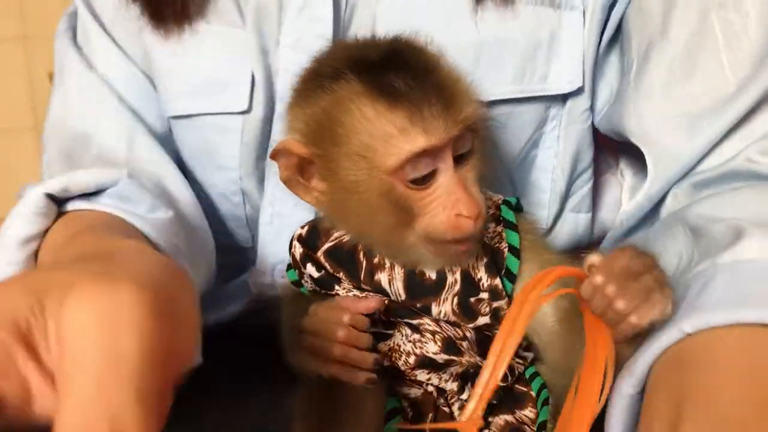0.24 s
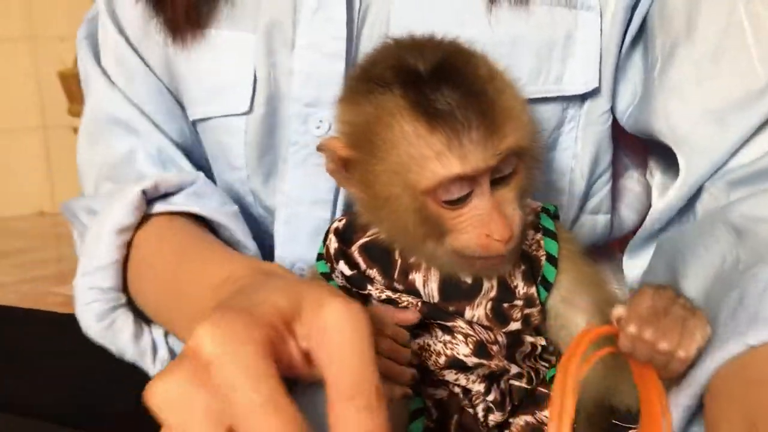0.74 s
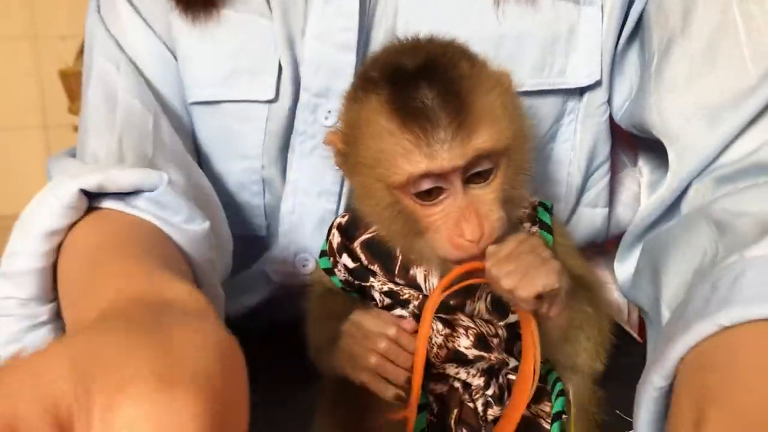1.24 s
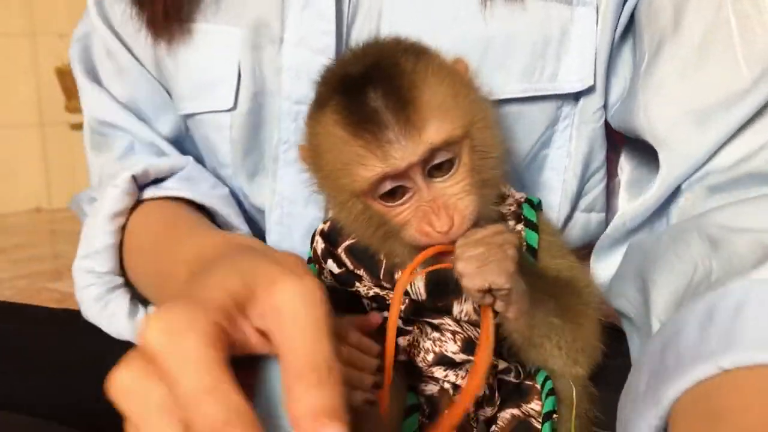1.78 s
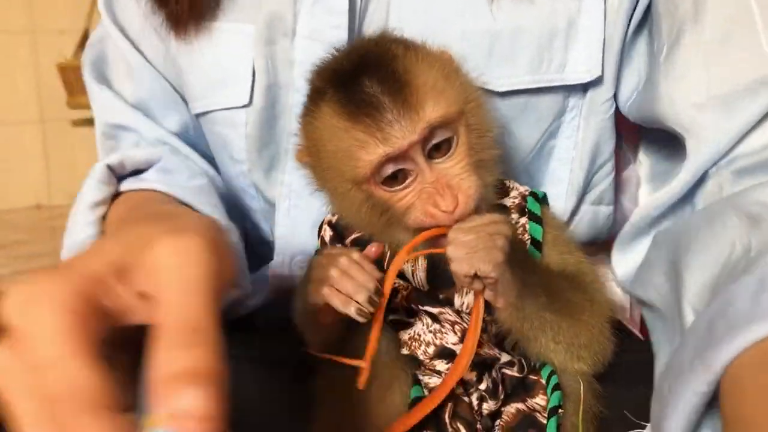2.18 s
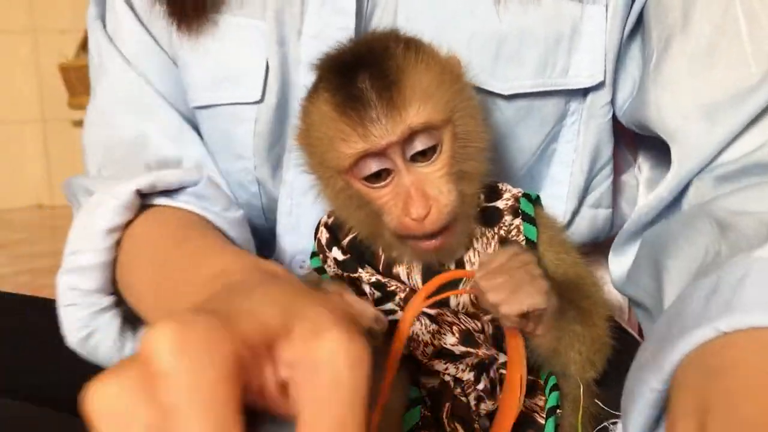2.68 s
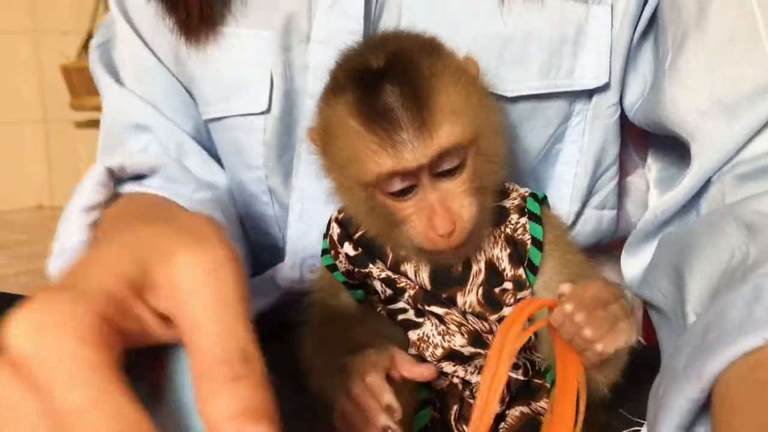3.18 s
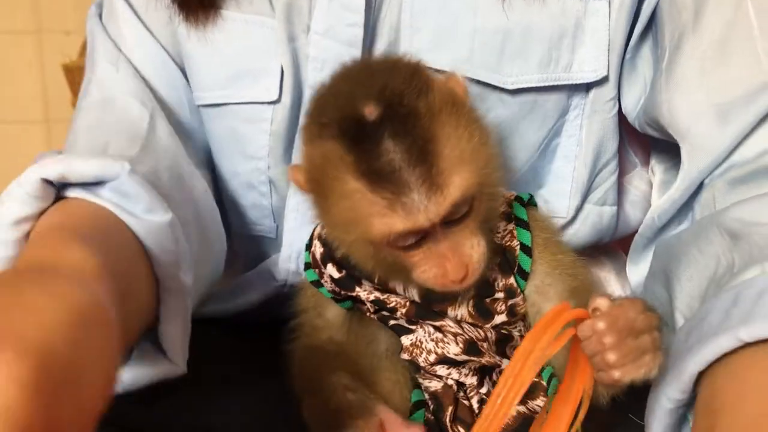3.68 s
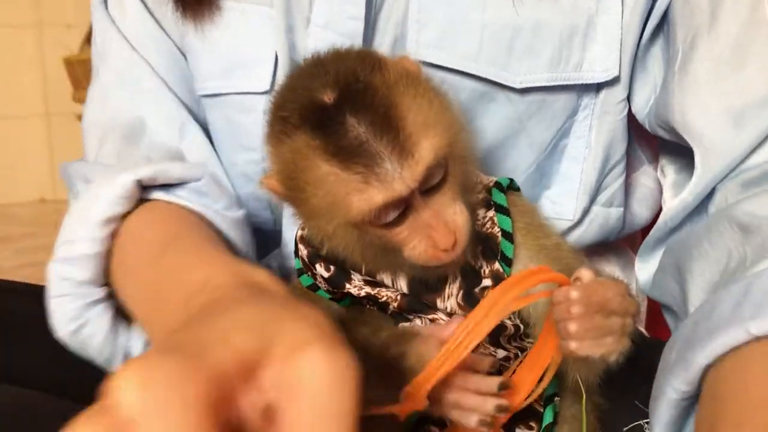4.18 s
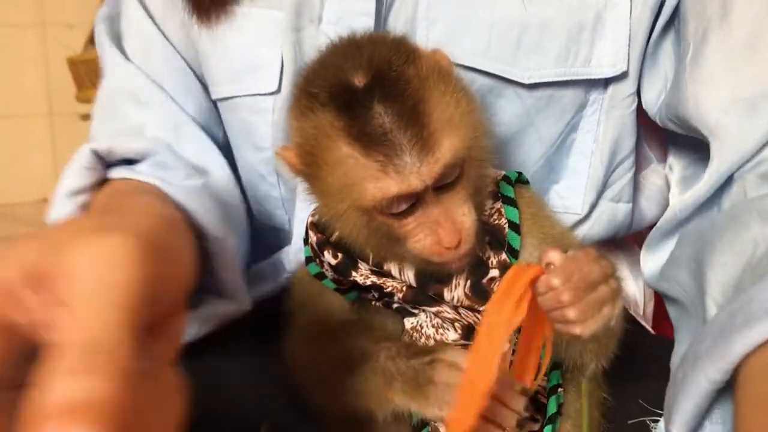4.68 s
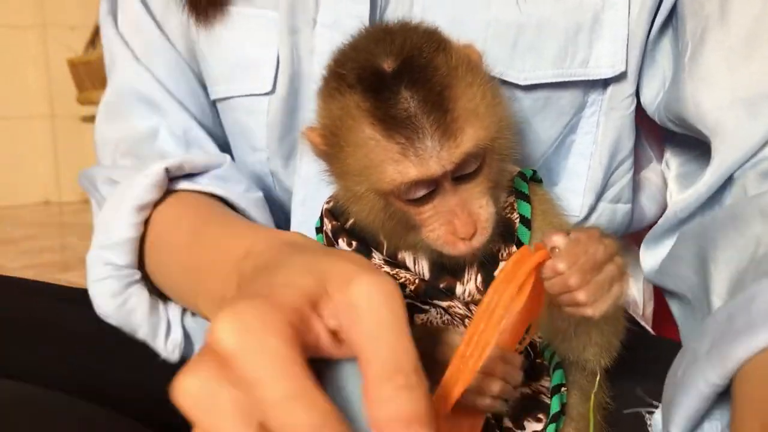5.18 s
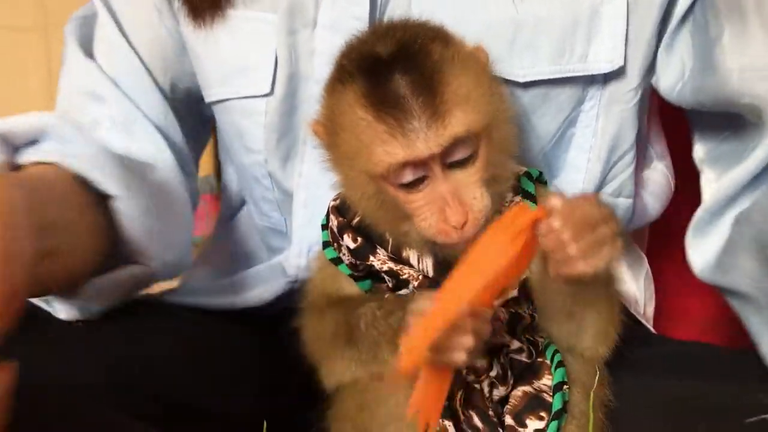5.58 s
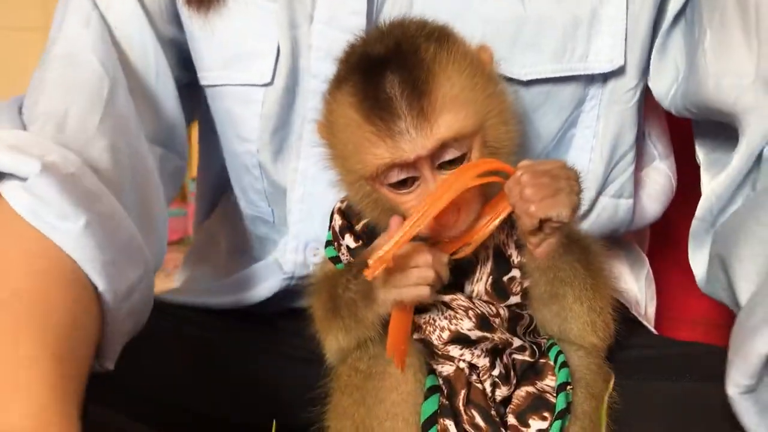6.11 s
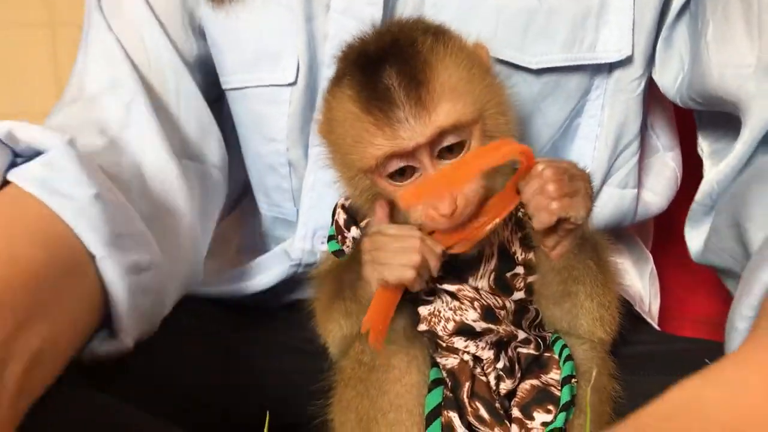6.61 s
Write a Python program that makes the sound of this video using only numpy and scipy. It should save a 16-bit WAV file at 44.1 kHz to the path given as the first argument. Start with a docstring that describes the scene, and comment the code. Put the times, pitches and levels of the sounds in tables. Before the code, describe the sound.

A hand peeler rasps five times along a firm vegetable, each crisp hissing stroke starting with a sharp click, over faint low rumble in a quiet room.

```python
"""In a quiet home, a hand peeler is drawn five times along a firm vegetable close to a small microphone.
The blade lands with a crackle, then hisses: tiny random breaks shake the blade, whose slot and edge sing.
Small ticks are bursts of ringing noise; dull knocks on the board and a faint squeak are resonances and tones.
Cloth and peel rustle as filtered crackle; a far engine idles outside as a few sines over the room's air."""
import sys
import numpy as np
from scipy import signal
from scipy.fft import rfft, irfft
from scipy.io import wavfile

SR = 44100
rng = np.random.default_rng(int(sys.argv[2]) if len(sys.argv) > 2 else 0)


def bounce(signal):
    """Save signal as a 16-bit WAV file at the path given by the first command-line argument."""
    frames = np.transpose(np.atleast_2d(signal))
    limited = np.clip(frames, -1, 1)
    pcm = np.round(limited * 32767).astype(np.int16)
    wavfile.write(sys.argv[1], SR, pcm)


N = 302085   # length in samples


def from_db(db):
    """Turn decibels into a gain."""
    return 10 ** (np.asarray(db) / 20)


def rms_one(x):
    """Scale to an average strength (rms) of 1."""
    return x / np.sqrt(np.mean(x ** 2) + 1e-20)


def in_time(rows):
    """Draw each column after the time as a line through the whole scene."""
    times_s, *columns = np.transpose(rows)
    return [np.interp(np.arange(N) / SR, times_s, column) for column in columns]


def while_on(rows, fade_s=0.023):
    """1 between the first and last row, fading to 0 outside."""
    start_s, end_s = rows[0][0], rows[-1][0]
    corners_s = [start_s - fade_s, start_s, end_s, end_s + fade_s]
    return np.interp(np.arange(N) / SR, corners_s, [0, 1, 1, 0])


def swell(start_s, length_s):
    """A rounded rise and fall: the square root of half a sine."""
    along = np.clip((np.arange(N) / SR - start_s) / length_s, 0, 1)
    return np.sqrt(np.abs(np.sin(np.pi * along))) * (along < 1)


def drift(rate_hz):
    """Slow chance with spread 1: noise at every 40th sample, smoothed twice by a one-pole low-pass."""
    r = np.exp(-80 * np.pi * rate_hz / SR)
    noise = rng.standard_normal(N // 40 + 2002)
    slow = signal.lfilter([1], [1, -2 * r, r * r], noise)[2000:]   # skip the filter's start
    return np.interp(np.arange(N) / 40, np.arange(len(slow)), rms_one(slow))


def coloured(x, spectrum):
    """Weight the frequencies of x by a curve in dB; rms 1."""
    hz, level_db = np.transpose(spectrum)
    log_hz = np.log(np.fft.rfftfreq(len(x), 1 / SR) + 1)
    gain = from_db(np.interp(log_hz, np.log(hz), level_db, -90, -90))
    return rms_one(irfft(rfft(x) * gain, len(x)))


def band(x, low_hz, high_hz):
    """Keep the sound between two frequencies."""
    edges_hz = [low_hz, min(high_hz, .45 * SR)]
    return signal.sosfilt(signal.butter(2, edges_hz, "band", fs=SR, output="sos"), x)


def resonance(x, hz, width_hz):
    """Let x ring at one frequency: a two-pole resonance with gain 1 on top."""
    r = np.exp(-np.pi * width_hz / SR)
    feedback = [1, -2 * r * np.cos(2 * np.pi * hz / SR), r * r]
    return signal.lfilter(np.array([1, 0, -1]) * (1 - r * r) / 2, feedback, x)


def grains(per_s, spread_db):
    """Random tiny breaks of uneven size and either sign; rms 1."""
    sizes = from_db(spread_db * np.minimum(rng.exponential(1, N), 4)) * rng.choice([-1, 1], N)
    return rms_one(sizes * (rng.random(N) < per_s / SR))


def wavering(hz, width_hz):
    """A tone that follows hz, smeared by chance in size and phase; rms 1."""
    phase = 2 * np.pi * np.cumsum(hz) / SR
    return rms_one(drift(width_hz) * np.cos(phase) + drift(width_hz) * np.sin(phase))


# cloth and peel rustle, and street wash: (time [s], rustle level [dB], wash level [dB])
RUSTLE_AND_WASH = [(0.0, -59.5, -48.5), (0.12, -64.5, -54), (0.3, -61.5, -59.5), (1.2, -66, -59.5),
                   (2.2, -63, -60.5), (3.05, -62.5, -58.5), (3.3, -67, -59.5), (3.8, -65, -60.5),
                   (4.6, -65, -58.5), (4.9, -66.5, -59.5), (5.3, -64, -56.5), (5.55, -64, -59),
                   (6.2, -65, -60.5), (6.85, -65, -59.5)]
# colour of the rustle: (frequency [Hz], level per Hz [dB])
RUSTLE_COLOUR = [(710, -35), (1200, -3), (1590, -2), (1750, -5.5), (2520, -4), (15700, -10.5)]
# colour of the street wash: (frequency [Hz], level per Hz [dB])
WASH_COLOUR = [(88, -19), (150, 4), (195, -14.5), (288, -1.5), (425, -11), (756, -8), (846, -10),
               (1430, -12), (3000, -23.5), (3900, -24.5), (6600, -120)]
# colour of the low rumble: (frequency [Hz], level per Hz [dB])
RUMBLE_COLOUR = [(13, -52), (22, -17), (66, 2), (102, 4), (134, -1), (230, -7.5), (300, -57), (510, -120)]
RUMBLE_DB = -59


def background():
    """Rustle is a dense stream of tiny breaks; street wash and a steady rumble are filtered noise."""
    rustle_db, wash_db = in_time(RUSTLE_AND_WASH)
    rustle = from_db(rustle_db + 0.55 * drift(37)) * coloured(grains(20000, 0.55), RUSTLE_COLOUR)
    wash = from_db(wash_db + 1.5 * drift(13.0)) * coloured(rng.standard_normal(N), WASH_COLOUR)
    rumble = from_db(RUMBLE_DB) * coloured(rng.standard_normal(N), RUMBLE_COLOUR)
    return rustle + wash + rumble


# speed of the idling engine: (time [s], turns per second [1/s])
ENGINE_SPEED = [(0, 19.8), (1, 20.5), (1.8, 21), (2.4, 21.2), (3.1, 19.6), (4.5, 19.3), (5.1, 19.7),
                (6.4, 20.5)]
# swells of engine orders 4, 5, 6 and 7, one list each: (start [s], length [s], level at the top [dB])
ENGINE_SWELLS = [
    [(0.5, 4.66, -58.5), (4.8, 2.15, -60)],
    [(0.2, 2.6, -62), (3.6, 0.8, -57.5), (5.0, 2.4, -65.5)],
    [(1.5, 3.33, -59.5), (4.6, 1.29, -56), (5.6, 1.37, -55.5)],
    [(0.1, 4, -65.5)],
]


def engine():
    """Sines at 4 to 7 times the turning speed, each swelling on its own."""
    turns_per_s, = in_time(ENGINE_SPEED)
    angle = 2 * np.pi * np.cumsum(turns_per_s) / SR
    out = np.zeros(N)
    for order, swells in enumerate(ENGINE_SWELLS, start=4):
        level = sum(from_db(db) * swell(start_s, length_s) ** 2 for start_s, length_s, db in swells)
        tone = np.sqrt(2) * np.sin(order * angle + rng.uniform(0, 2 * np.pi))   # rms 1
        out += level * from_db(1.2 * drift(4)) * tone
    return out


# soft brushes of cloth and peel: (start [s], length [s], level [dB], lowest [Hz], highest [Hz])
BRUSH_SWELLS = [(1.898, 0.031, -45, 9300, 15700), (2.094, 0.04, -55.5, 2940, 15000),
                (3.143, 0.037, -59, 7000, 15500), (5.134, 0.37, -62.5, 610, 890),
                (5.219, 0.069, -54, 170, 320), (5.757, 0.22, -64, 3460, 8550),
                (5.862, 0.057, -60, 5900, 15500), (6.63, 0.15, -63.5, 10300, 15500)]


def brushes():
    """Cloth and peel rub in short swells of fine crackle."""
    fine = grains(14000, 2.5) * from_db(2.0 * drift(60))
    out = np.zeros(N)
    for start_s, length_s, db, low_hz, high_hz in BRUSH_SWELLS:
        out += from_db(db) * swell(start_s, length_s) * rms_one(band(fine, low_hz, high_hz))
    return out


# a faint rough squeak: (time [s], pitch [Hz], level of each of its two main tones [dB])
SQUEAK_PATH = [(5.975, 2420, -74), (6.0, 2410, -62), (6.125, 2336, -63), (6.16, 2395, -71),
               (6.33, 2466, -79)]


def squeak():
    """A breathy pair of close, rough tones with weaker overtones."""
    hz, level_db = in_time(SQUEAK_PATH)
    pair = np.zeros(N)
    for ratio in (.965, 1.025):
        pair += wavering(ratio * hz, 50)
        pair += from_db(-10) * wavering(2 * ratio * hz, 120)
        pair += from_db(-17) * wavering(3 * ratio * hz, 260)
    return while_on(SQUEAK_PATH) * from_db(level_db) * pair


# dull knocks of the vegetable on the board: (time [s], peak level [dB], ring [Hz], time to fall 60 dB [s])
BOARD_KNOCKS = [(1.286, -39, 585, 0.018), (2.463, -41, 750, 0.014), (3.1604, -35, 813, 0.019),
                (3.170, -38, 810, 0.01), (3.1814, -28.5, 697, 0.015), (4.485, -39.5, 880, 0.0079),
                (5.242, -48.5, 209, 0.055), (5.309, -47, 229, 0.065), (5.616, -47, 750, 0.016)]
BOUNCE = 1.54   # strength of a second touch, times the first


def knocks():
    """A soft push of half a cycle starts the ring; a second touch within a cycle adds to overtone and board."""
    length = 9000   # samples
    out = np.zeros(N + length)
    for s, peak_db, hz, t60_s in BOARD_KNOCKS:
        push = np.hanning(int(.5 * SR / hz))   # the lower the ring, the softer the contact
        first = np.pad(push, (0, length - len(push)))
        both = first + BOUNCE * np.roll(first, int(SR / hz / 1.5))
        ring = resonance(first, hz, 2.2 / t60_s)
        ring += 0.25 * resonance(both, 1.5 * hz, 400)   # short overtone
        ring += 0.55 * resonance(both, 235, 50)         # the board
        out[round(s * SR):][:length] += from_db(peak_db) * ring / np.abs(ring).max()
    return out[:N]


FAINT_TICKS_DB = -52   # mean peak of the small random ticks


def faint_ticks(count=24):
    """Small ticks at random moments, with random peak, pitch and brightness."""
    when, size, pitch, bright = rng.random((count, 4)).T
    peak_db = FAINT_TICKS_DB + 8 * (size - .5)
    return list(zip(when * N / SR, peak_db, 2000 * 3 ** pitch, 12 * (bright - .5)))


# ticks of blade, peel and teeth: (time [s], peak level [dB], centre [Hz], treble against the centre [dB])
PLACED_TICKS = [(0.2723, -44.5, 3270, -18), (0.3258, -16, 4400, 9), (0.3286, -20, 3640, -9),
                (0.3331, -20.5, 5000, 4), (0.3352, -27.5, 4000, -19), (0.4, -37, 2960, -20),
                (0.456, -29, 9000, 7), (0.5025, -23, 11000, 0), (0.8148, -28, 5540, -4),
                (0.854, -38.5, 4300, -3), (0.9575, -45, 3440, -9), (1.052, -41, 3480, 1),
                (1.0685, -36, 2300, -28), (1.071, -39, 3500, -24), (1.269, -37, 6300, -1),
                (1.2727, -29, 5540, -13), (1.2771, -18.5, 4540, 1), (1.285, -22, 2200, -7),
                (1.287, -18, 4400, 9), (1.29, -27, 4400, 0), (1.31, -38, 4050, 1), (1.574, -27, 3900, -6),
                (1.7963, -34, 3430, 1), (1.813, -38.5, 3410, -1), (1.8436, -37, 3630, -15),
                (1.8558, -37.5, 3480, -4), (1.8647, -32, 5470, 8), (1.871, -37, 3950, 2),
                (1.9032, -40, 7380, 12), (1.9191, -32, 3550, 0), (1.9729, -32.5, 6700, -3),
                (1.9794, -35.5, 2610, 3), (2.4144, -31, 3770, 0), (2.4202, -27, 4160, 0),
                (2.4327, -9.5, 4500, 6), (2.4348, -21.5, 3540, -7), (2.4383, -19.5, 2680, -1.5),
                (2.4615, -33.5, 2740, -25), (2.9188, -26.5, 3050, -2), (2.9488, -29, 3670, -0.5),
                (3.031, -29, 4700, 2), (3.0375, -31.5, 3570, -13), (3.0523, -36.5, 2870, -6.5),
                (3.0914, -40, 3720, -1), (3.104, -41, 2560, -26), (3.159, -37, 2450, -1),
                (3.17, -37.5, 3930, -4), (3.1816, -33, 4250, -9), (3.243, -41, 4930, 1),
                (3.379, -48, 8000, 15), (3.4347, -44.5, 3400, -21), (3.48, -44, 3820, 2),
                (3.487, -42.5, 3820, 0), (3.835, -35, 2000, -8), (3.844, -20.5, 3300, 5),
                (3.8487, -26, 4400, -5), (3.8545, -31, 5000, 1), (3.9544, -37, 1820, 2),
                (4.021, -35, 2800, -4), (4.092, -30, 6000, 13), (4.205, -34, 6000, 13),
                (4.395, -40, 2200, -17), (4.4052, -29, 5200, -4), (4.4093, -27, 3700, -1.5),
                (4.4255, -40, 4500, -2), (4.432, -33, 4500, -8), (4.4475, -26, 3940, 0.5),
                (4.48, -40, 3670, -10), (4.4843, -32, 3140, -5), (4.7265, -33, 6000, 9),
                (4.8816, -11, 2950, 6), (4.8868, -20, 5900, -7), (5.237, -29, 6160, -6),
                (5.322, -46, 3030, -15), (5.6455, -35, 2600, 2), (5.834, -41, 2600, 0),
                (5.871, -38, 6000, 1), (6.2075, -38, 4300, 4), (6.2203, -31.5, 4850, 9)]
TICK_BASE_T60_S, TICK_RISE_S = 0.022, 0.00058   # fall by 60 dB before brightness and pitch alter it; onset


def ticks():
    """Each tick is a short spiky crackle ringing broadly at its centre, with body and treble added."""
    length = 1200   # samples
    t = np.arange(length) / SR
    out = np.zeros(N + length)
    rows = PLACED_TICKS + faint_ticks()
    noises = rng.standard_normal((len(rows), length))
    all_lumps = rng.standard_normal((len(rows), 30))
    for (s, peak_db, hz, treble_db), noise, lumps in zip(rows, noises, all_lumps):
        # bright ticks, and those above 7 kHz, die sooner
        t60_s = TICK_BASE_T60_S * from_db(-.25 * max(treble_db, -6)) * min(1, 7000 / hz)
        fall_db = -60 * t / t60_s + 2.5 * np.repeat(lumps, 40)
        crackle = noise * from_db(fall_db) * np.minimum(t / TICK_RISE_S, 1)
        crackle *= 1 + 2 * from_db(-60 * t / 0.008)   # the first contact snaps
        ring = rms_one(resonance(resonance(crackle, hz, .6 * hz), hz, .6 * hz))
        # dull and high ticks stay near their centre
        spill = from_db(1.8 * min(treble_db + 14, 0)) * min(1, (6000 / hz) ** 3)
        middle, low = rms_one(band(crackle, 1250, 9200)), rms_one(band(crackle, 400, 1520))
        ring += spill * (1.7 * middle + 0.27 * low)
        tick = rms_one(ring) + from_db(treble_db) * rms_one(band(crackle, 4900, 20000))
        out[round(s * SR):][:length] += from_db(peak_db) * tick / np.abs(tick).max()
    return out[:N]


# moments when the grip frees a mode and it sings, sliding as the blade tilts:
# (start [s], length [s], first pitch [Hz], last pitch [Hz], level [dB])
FREED_MODES = [(0.47, 0.12, 3340, 3330, -49), (0.574, 0.081, 3600, 3500, -48.5),
               (0.48, 0.051, 5700, 4900, -48), (.585, 0.08, 5700, 5900, -50.5),
               (0.496, 0.21, 2200, 2170, -55.5), (0.586, .06, 4550, 4500, -50),
               (0.656, 0.042, 3500, 3600, -45.5), (0.686, 0.075, 4300, 4380, -47),
               (0.708, 0.085, 2380, 2320, -52.5), (1.338, 0.17, 3200, 3170, -48.5),
               (1.452, 0.13, 2270, 2160, -52.5), (1.502, 0.08, 3500, 3840, -48),
               (1.4, 0.18, 6600, 6700, -57), (1.2, .06, 4900, 5600, -57), (1.56, 0.16, 2360, 2160, -56),
               (2.49, 0.05, 1800, 2200, -55), (2.583, 0.14, 2240, 2200, -50),
               (2.708, 0.17, 2300, 2350, -48), (2.517, 0.076, 6700, 6800, -55),
               (2.575, 0.096, 6200, 6900, -51), (2.65, 0.041, 3700, 3340, -52),
               (2.738, 0.14, 3530, 3600, -53.5), (2.642, .24, 4550, 4340, -53.5),
               (4.017, 0.064, 6660, 7200, -50.5), (4.06, 0.072, 2950, 2600, -48),
               (4.063, 0.087, 6300, 5700, -55), (4.17, 0.078, 5800, 6020, -46.5),
               (4.268, 0.12, 6900, 5100, -50), (4.29, 0.052, 2330, 2310, -55.5),
               (4.292, 0.063, 4500, 4270, -50), (4.92, 0.12, 2600, 2730, -55),
               (4.944, 0.1, 1900, 1800, -57), (4.974, 0.078, 6750, 6900, -53),
               (5.067, 0.056, 6700, 7000, -56), (5.058, 0.061, 3800, 5100, -47.5),
               (5.128, 0.056, 2240, 2280, -55), (5.161, 0.046, 4450, 4650, -47),
               (5.11, .06, 5900, 6000, -53)]
SING_WIDTH_HZ = 150   # width of a singing mode


def sings(stream):
    """Each freed mode is a sliding resonance: the stream is shifted down, smoothed and shifted back."""
    out = np.zeros(N)
    keep = np.exp(-np.pi * SING_WIDTH_HZ / SR)
    for start_s, length_s, first_hz, last_hz, db in FREED_MODES:
        along = np.linspace(0, 1, int(length_s * SR))
        hz = first_hz + (last_hz - first_hz) * along
        turn = np.exp(2j * np.pi * np.cumsum(hz) / SR)
        start = round(start_s * SR)
        part = slice(start, start + len(along))
        smooth = signal.lfilter([1], [1, -keep], stream[part] / turn)
        ring = rms_one(np.real(turn * smooth))
        out[part] += from_db(db) * np.sqrt(np.abs(np.sin(np.pi * along))) * ring
    return out


# pressure of each stroke, heard as its hiss, one list per stroke: (time [s], level [dB])
STROKE_HISS = [
    [(0.345, -82), (0.395, -68), (0.45, -45), (0.47, -45.5), (0.53, -37), (0.6, -37), (0.65, -42),
     (0.7, -39.5), (0.775, -47), (0.795, -54)],
    [(1.3, -69), (1.345, -56), (1.37, -44.5), (1.41, -38), (1.49, -34.5), (1.57, -40), (1.67, -40),
     (1.735, -45.5), (1.77, -62)],
    [(2.445, -68), (2.49, -60), (2.52, -44.5), (2.58, -39.5), (2.66, -37), (2.74, -41.5), (2.82, -46),
     (2.878, -45.5), (2.892, -49)],
    [(3.87, -96), (3.96, -66), (4.015, -63), (4.025, -47.5), (4.09, -38.5), (4.2, -39.5), (4.26, -43),
     (4.365, -39), (4.385, -59)],
    [(4.9, -58), (4.94, -48), (4.98, -44), (5.02, -38.5), (5.08, -36), (5.13, -43.5), (5.195, -40),
     (5.225, -72)],
]
# colour of the hiss: (frequency [Hz], level per Hz [dB])
HISS_COLOUR = [(6000, -11.5), (7400, -6.5), (11000, -3.5), (14700, 2), (15750, 4)]
# high modes of the thin edge that flare in the hiss: (frequency [Hz], width [Hz], gain along a stroke [dB])
TIP_MODES = [(8730, 350, -0.5), (9980, 490, 10), (11030, 250, -12), (12100, 870, -1.5), (14200, 440, -8)]
# modes of the slot that the cut can favour: (frequency [Hz], width [Hz])
SLOT_MODES = [(1680, 430), (1950, 34), (2280, 76)]
# modes of the free blade and its swivel: (frequency [Hz], width [Hz])
FREE_MODES = [(3230, 1700), (3600, 20), (4500, 210)]
# modes of the edge: (frequency [Hz], width [Hz])
EDGE_MODES = [(5820, 330), (6800, 76)]
FIRM_DB = -40   # hiss of a firm stroke
SLOT_DB, FREE_DB, EDGE_DB, THRUM_DB = -51, -51.5, -53, -71   # parts at that hiss, as a stroke begins
SLOT_DRIFT_DB, FREE_DRIFT_DB, EDGE_DRIFT_DB, THRUM_RISE_DB = -10, -4.5, -0.5, 16   # change along a stroke
BLADE_FOLLOWS = 0.62   # share of the hiss's swing in dB
CATCH_DB, RASP_DB = 1.0, 1.2   # unevenness of the cut, slow and fast
TIPS_SHARE, FLARE_DB = 0.45, 4.5   # amount of the flaring tips, and how far they come and go
DAMPED, STREAK_DB = 0.25, 5.5   # share of a mode the grip leaves ringing, and how far it comes and goes


def strokes():
    """Cells burst under the edge in dense streams that shake the blade and the vegetable."""
    hiss_db, = in_time(np.concatenate(STROKE_HISS))
    ends = []
    for rows in STROKE_HISS:
        ends += [(rows[0][0], 0), (rows[-1][0], 1)]
    along, = in_time(ends)   # 0 at the start of a stroke, 1 at its end
    blade_db = BLADE_FOLLOWS * (hiss_db - FIRM_DB)

    unevenness = from_db(CATCH_DB * drift(32) + RASP_DB * drift(250))   # the edge catches and lets go
    cells = grains(16000, 3.0) * unevenness
    fibres = grains(12000, 4.5) * unevenness

    flares = np.zeros(N)
    for hz, width_hz, gain_db in TIP_MODES:
        flares += from_db(FLARE_DB * drift(4.5) + gain_db * along) * resonance(cells, hz, width_hz)
    cut = from_db(hiss_db) * coloured(cells + TIPS_SHARE * flares, HISS_COLOUR)
    cut += sings(band(fibres, 1330, 8500))

    # modes, level, change along a stroke, driving stream, lowest and highest Hz
    groups = [
        (SLOT_MODES, SLOT_DB, SLOT_DRIFT_DB, fibres, 1450, 3000),
        (FREE_MODES, FREE_DB, FREE_DRIFT_DB, cells, 2900, 5100),
        (EDGE_MODES, EDGE_DB, EDGE_DRIFT_DB, fibres, 5100, 7400),
    ]
    for modes, db, drift_db, stream, low_hz, high_hz in groups:
        broad = rms_one(band(band(stream, low_hz, high_hz), 0.85 * low_hz, 1.38 * high_hz))
        level = from_db(db + blade_db + drift_db * along)
        cut += level * broad
        for k, (hz, width_hz) in enumerate(modes):
            streak = from_db(STREAK_DB * drift(19.0)) * rms_one(resonance(broad, hz, width_hz))
            cut += DAMPED * level * streak * (-1) ** k   # neighbours ring in opposite sign

    # the vegetable itself hums along
    thrum = from_db(THRUM_DB + blade_db + THRUM_RISE_DB * along) * rms_one(band(cells, 504, 990))
    return sum(while_on(rows, fade_s=0.0037) for rows in STROKE_HISS) * (cut + thrum)


ROOM_T60_S, ROOM_DB = 0.56, -19   # time for the echoes to fall 60 dB; their level


def room(x):
    """A dull tail of dense echoes: fading noise, cut off after half a second."""
    t = np.arange(SR // 2) / SR
    noise = band(rng.standard_normal(len(t)), 300, 10600)
    tail = noise * from_db(-60 * t / ROOM_T60_S) * (t > .004)
    return signal.fftconvolve(x, tail / np.sqrt(np.sum(tail ** 2)))[:N]


def scene():
    """Put near sounds, their echoes and the background together; both channels are the same."""
    near = brushes() + squeak() + knocks() + ticks() + strokes()
    mix = background() + engine() + near + from_db(ROOM_DB) * room(near)
    return np.tile(mix, (2, 1))


# dips of the microphone port: (frequency [Hz], width [Hz], level [dB])
MICROPHONE_DIPS = [(7650, 500, -4), (10450, 600, -6)]
CUTOFF_HZ = 15800


def record(dry):
    """The microphone port weakens two narrow bands; the top is cut."""
    for hz, width_hz, db in MICROPHONE_DIPS:
        dry = dry - (1 - from_db(db)) * resonance(dry, hz, width_hz)
    return signal.sosfilt(signal.ellip(10, .5, 70, CUTOFF_HZ, fs=SR, output="sos"), dry)


dry = scene()
out = record(dry)
bounce(out)
```